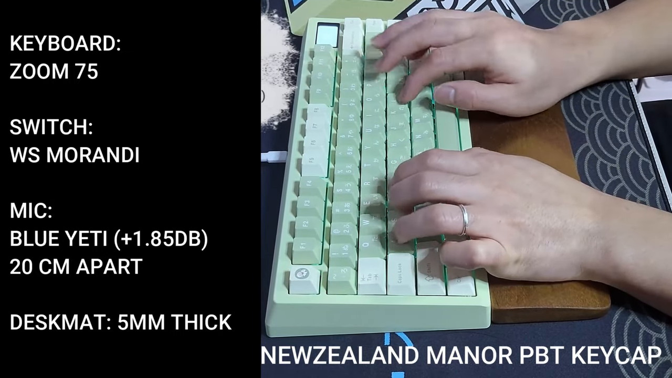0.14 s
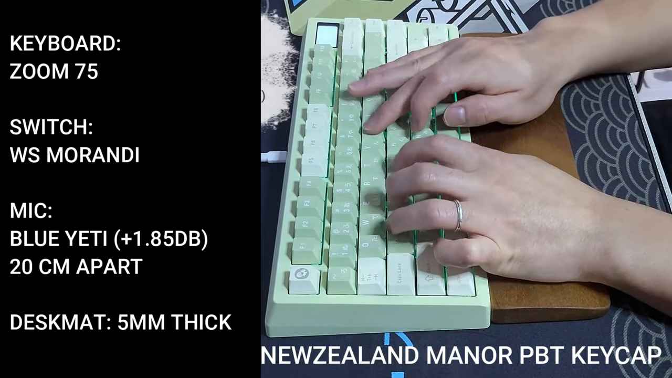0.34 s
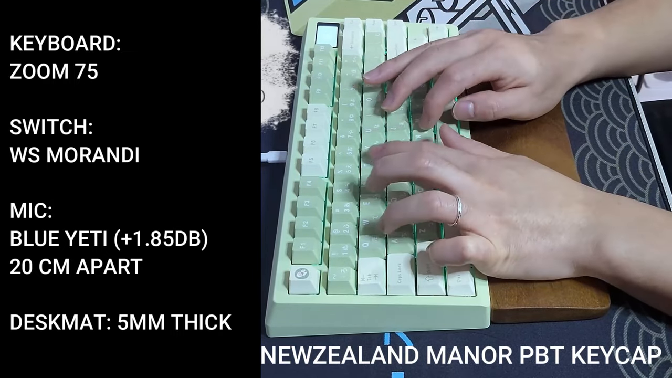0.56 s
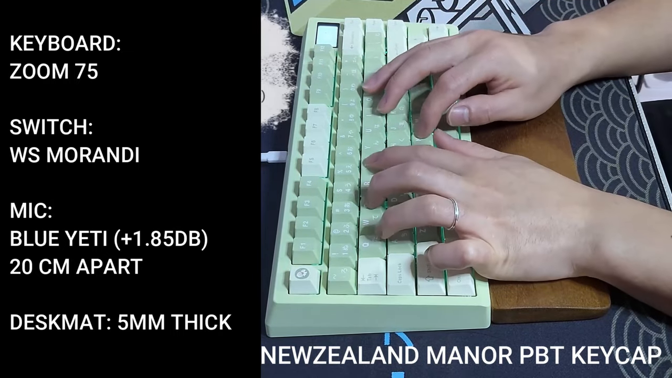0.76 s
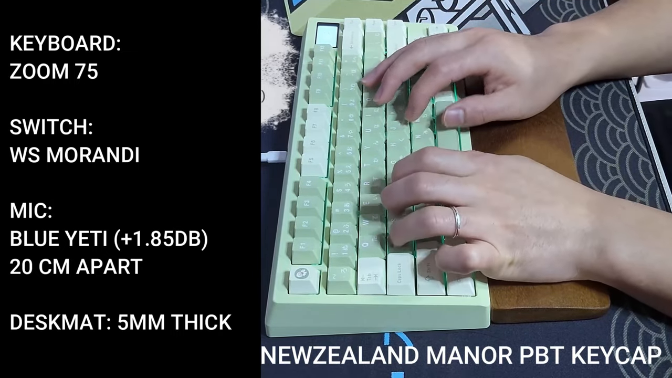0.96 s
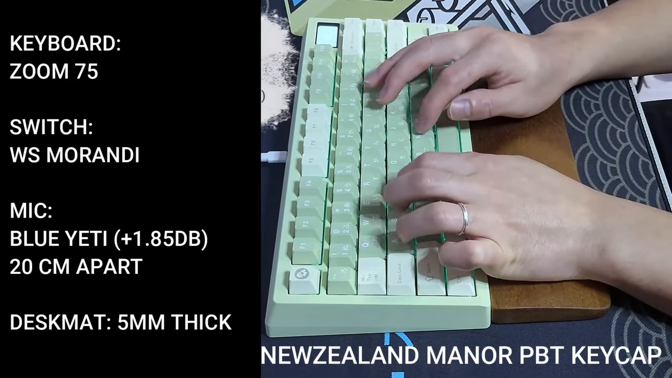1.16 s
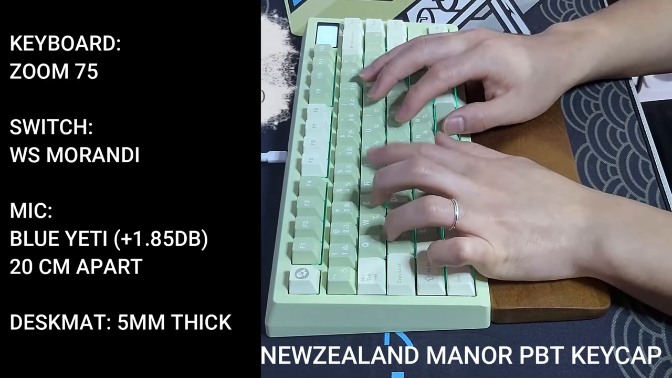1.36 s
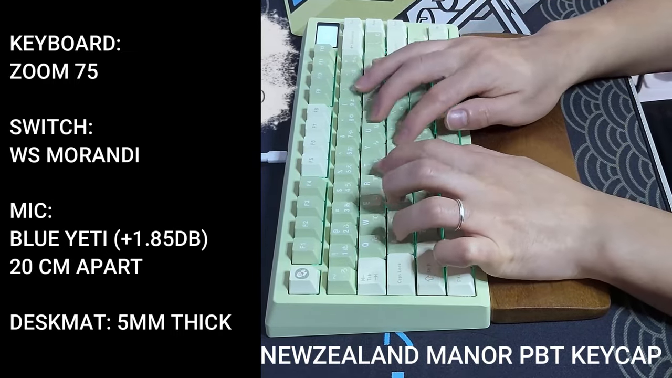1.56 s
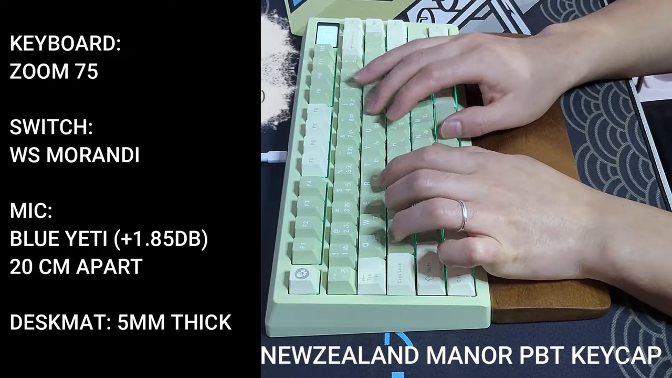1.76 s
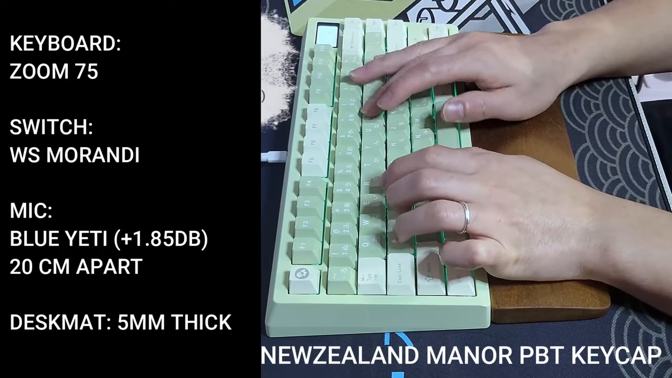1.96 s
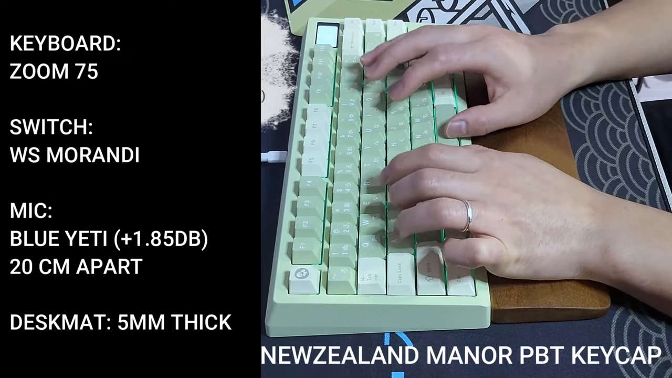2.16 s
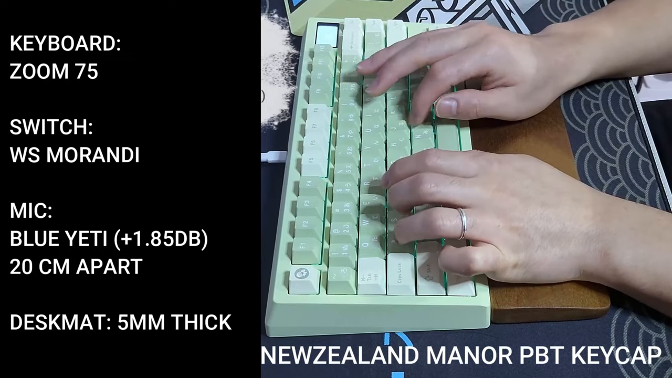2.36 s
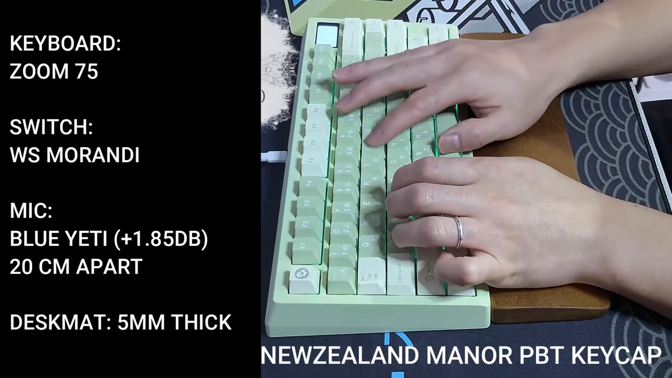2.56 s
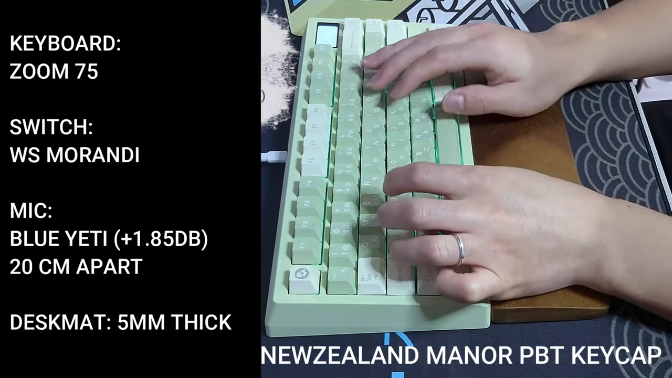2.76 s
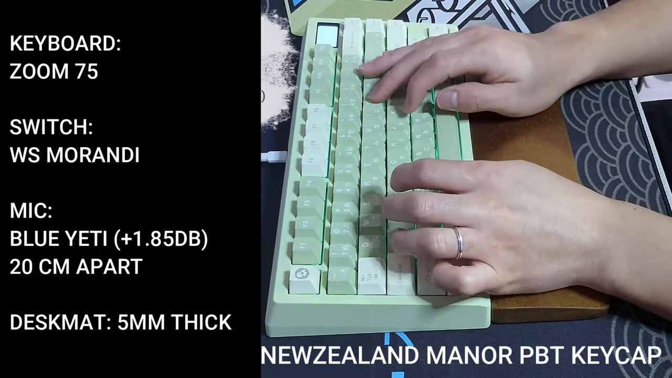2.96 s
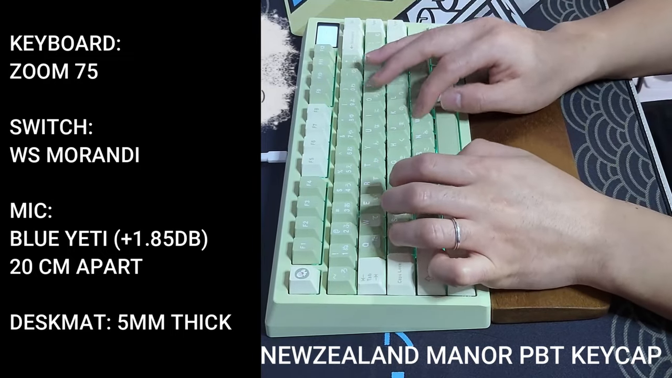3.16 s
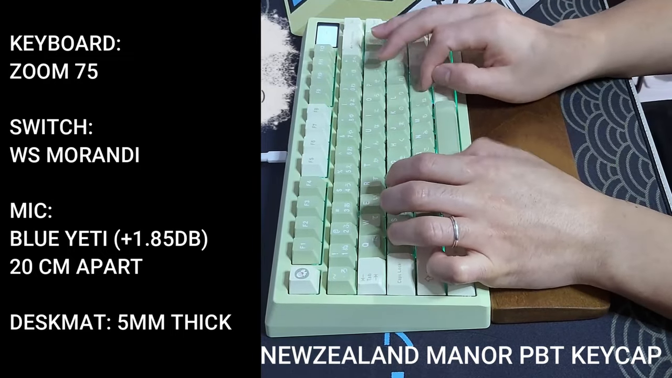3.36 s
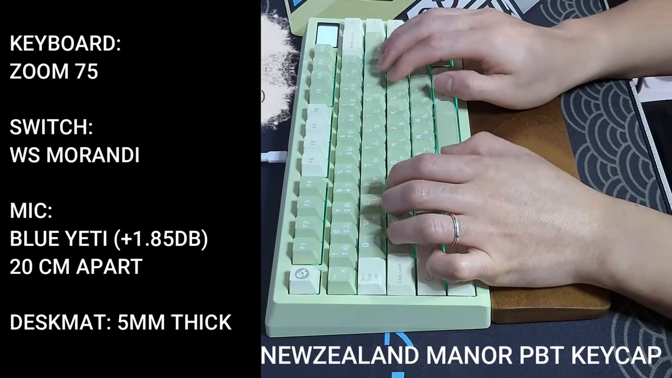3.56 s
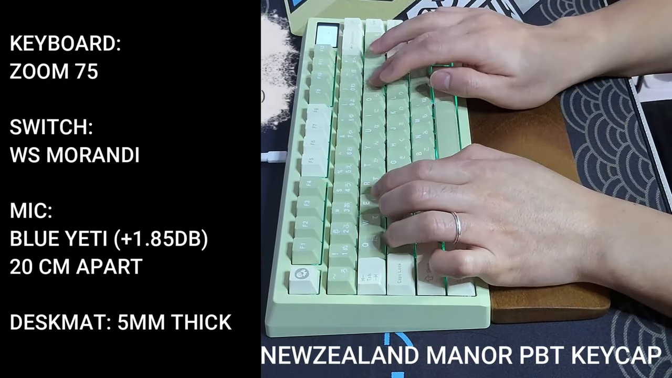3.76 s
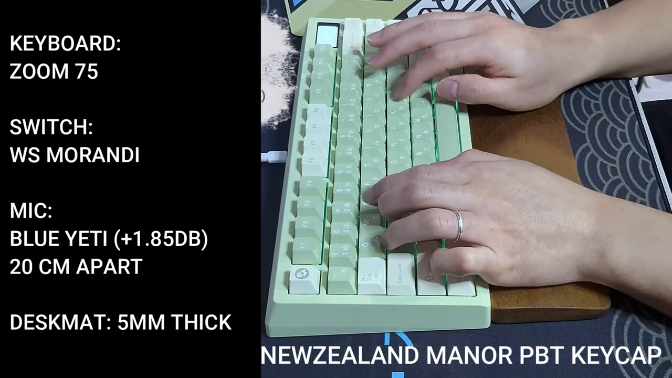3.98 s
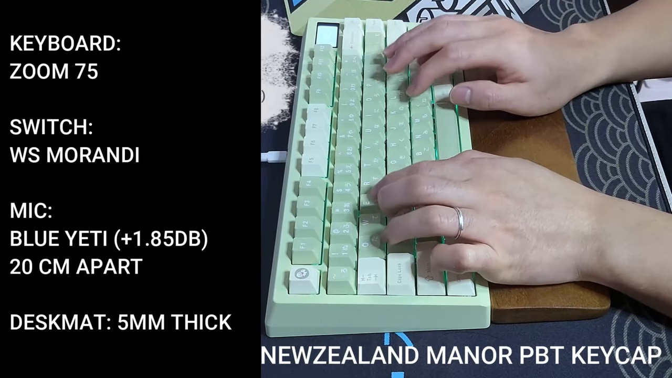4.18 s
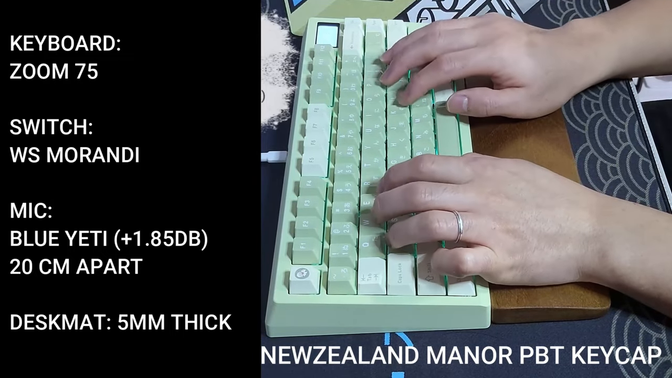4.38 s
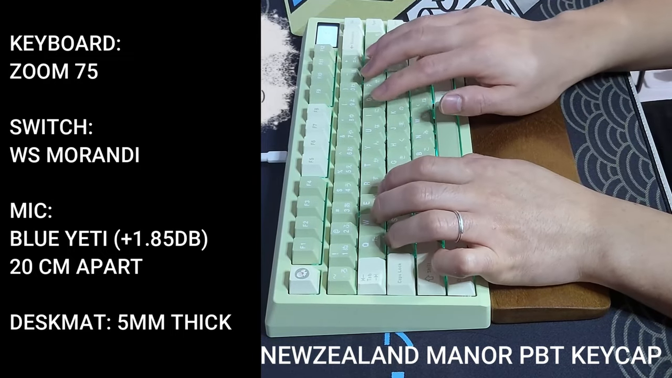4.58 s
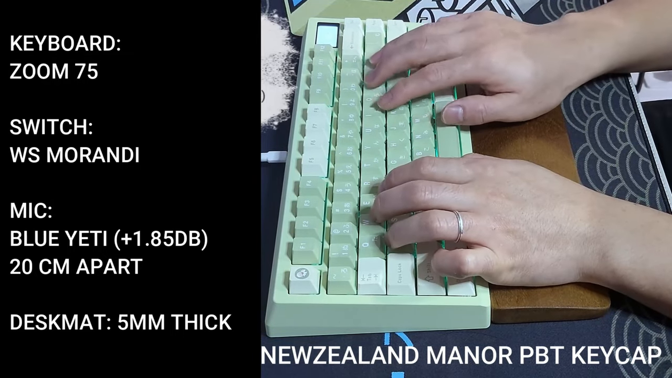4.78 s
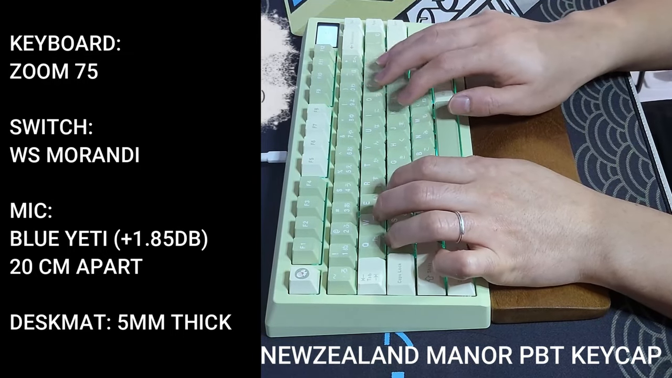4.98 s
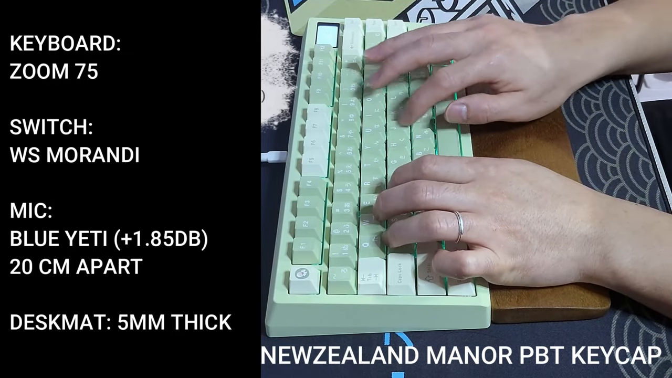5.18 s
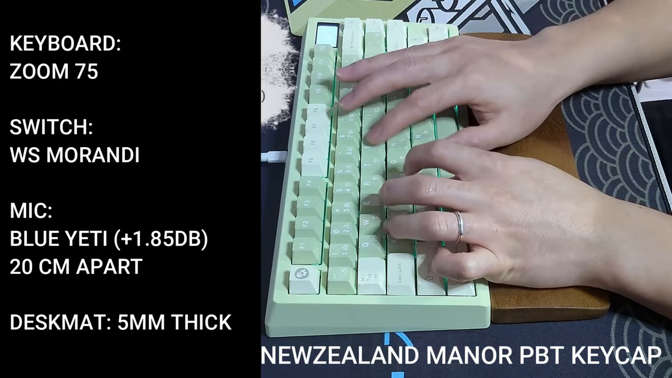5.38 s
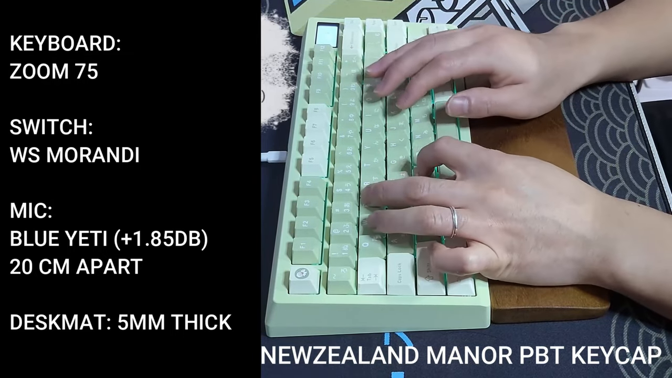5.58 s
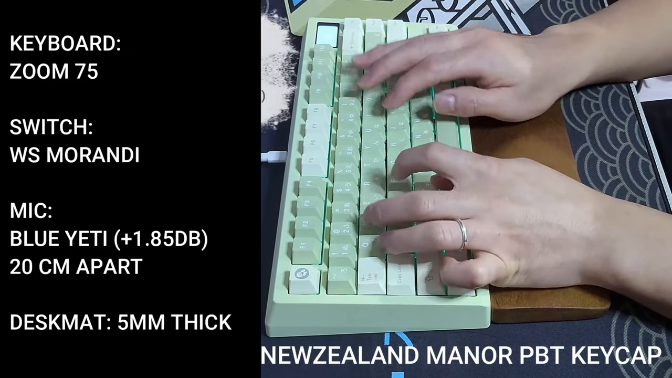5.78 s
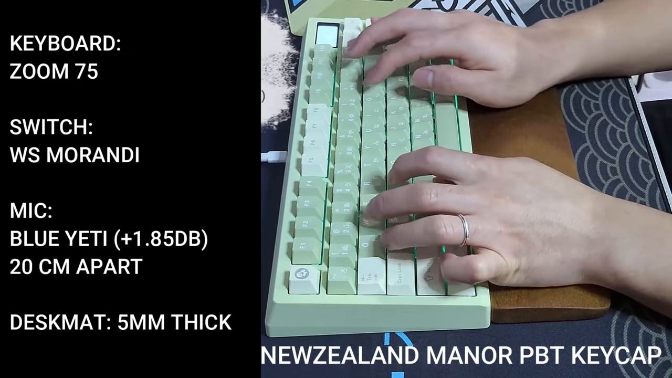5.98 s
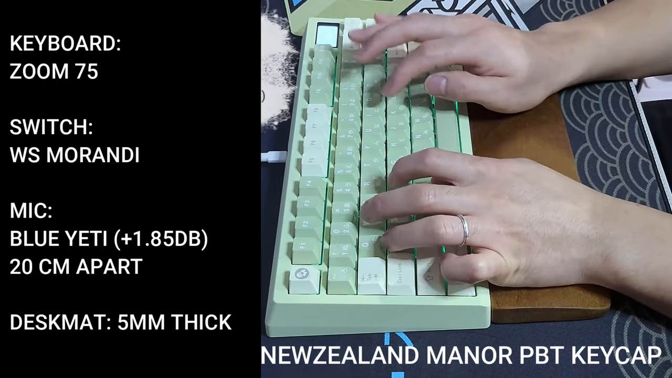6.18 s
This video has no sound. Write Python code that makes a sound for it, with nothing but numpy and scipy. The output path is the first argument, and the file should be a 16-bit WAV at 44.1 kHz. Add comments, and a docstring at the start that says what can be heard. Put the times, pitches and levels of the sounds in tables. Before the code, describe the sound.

Close, dry keyboard typing on a thick desk mat, rounded plastic clacks in uneven quick runs, briefly stopping before resuming, faint fan hum behind.

```python
"""Fast typing on a damped keyboard

A mechanical keyboard on a desk mat, heard close up in a small room: low thocks as keys bottom out, higher clacks
as they spring back, hollow knocks from wide keys. Each blow excites short resonances of keycap, switch plate and
case, under a tiny switch tick. Coloured noise makes the rustle of fingers, the rumble of the desk and the room air;
narrow resonances of noise make the fan hum. The hands pause once."""
import sys
import numpy as np
from scipy import signal
from scipy.fft import rfft, irfft
from scipy.io import wavfile

SR = 44100
rng = np.random.default_rng(int(sys.argv[2]) if len(sys.argv) > 2 else 0)


def pcm_store(signal):
    """Save signal as 16-bit PCM."""
    levels = np.round(np.clip(np.atleast_2d(signal), -1, 1) * 32767)
    wavfile.write(sys.argv[1], SR, levels.astype(np.int16).T)


N = 274743

# wide keys, which knock mostly on the plate: (time [s], relative level [dB])
WIDE_KEYS = [(.169, 10.5), (0.2749, 8.5), (3.6292, 9), (4.325, 7.5), (5.2733, 2.5)]


def from_db(db):
    """Decibels to gain."""
    return 10 ** (np.asarray(db) / 20)


def rms_one(x):
    """Scale to an rms of 1."""
    return x / np.sqrt(np.mean(x ** 2) + 1e-20)


def at_hz(points, hz, axis=1):
    """Read one column of a table along log frequency."""
    table = np.array(points)
    return np.interp(np.log(np.maximum(hz, 1)), np.log(table[:, 0]), table[:, axis])


def cut(x, hz, kind, order=2):
    """Butterworth filter."""
    sections = signal.butter(order, np.minimum(hz, SR / 2 - 10), kind, fs=SR, output="sos")
    return signal.sosfilt(sections, x)


def resonate(x, hz, width_hz):
    """Two-pole resonance with a gain of 1 at its top: the narrower, the longer it rings."""
    radius = np.exp(-np.pi * width_hz / SR)
    zeros = np.array([1, 0, -1]) * (1 - radius ** 2) / 2
    poles = [1, -2 * radius * np.cos(2 * np.pi * hz / SR), radius ** 2]
    return signal.lfilter(zeros, poles, x + 1e-18)   # the inaudible offset avoids slow denormal numbers


def fade(t, t60):
    """Exponential decay by 60 dB in t60."""
    return np.exp(-np.log(1000) * t / t60)


def add(track, s, sound):
    """Mix a sound into the track from time s on."""
    start = max(round(s * SR), 0)
    track[start:start + len(sound)] += sound[:N - start]


def grains(size_db):
    """Friction: countless tiny slips of uneven size."""
    return rng.standard_normal(N) * from_db(size_db * np.minimum(rng.exponential(1, N), 6))


def noise(spectrum, grain_db=0):
    """Noise of a given colour and graininess, rms 1."""
    gain = from_db(at_hz(spectrum, np.fft.rfftfreq(N, 1 / SR)))
    return rms_one(irfft(rfft(grains(grain_db)) * gain, N))


def keystrokes():
    """Each key shares its blow between cap, plate, case and desk. Returns the near sound and what fills the room."""
    # faint ring of a compressed key spring: (frequency [Hz], width [Hz], relative level [dB])
    spring_modes = [(4660, 150, -16.5), (4850, 200, -27), (5070, 270, -28)]
    lead_s, lead_db = 0.0099, -21.5   # faint early tick: time before the stop, level relative to the main tick
    spring_growth = 2.5   # dB of spring ring per dB of thud
    near, radiated, ticks, springs, slaps, thuds = np.zeros((6, N))
    push = signal.unit_impulse(3000)
    for s, key, thud_db, tick_db in strokes():
        plate_db = key[2]
        light = from_db(-9) * chatter(t60=0.017, build_s=0.00058)
        heavy = from_db(-5.5) * chatter(t60=0.024, build_s=0.0021)
        # the struck key rings first, then the shock spreads over neighbours of unlike pitch
        add(near, s, clack(key, push, push, spread=1.0) + clack(key, light, heavy, spread=1.2))
        add(radiated, s, clack(key, push, push, spread=1.2))
        contact = blow(chatter_db=-3, chatter_t60=0.0072, build_s=0.00022)
        add(ticks, s, from_db(tick_db) * contact)
        # the stem ticks faintly as it starts to move
        add(ticks, s - lead_s, from_db(tick_db + lead_db) * contact)
        # the blow on the plate also wakes a high mode
        add(slaps, s, from_db(plate_db) * contact)
        # the key thuds into the desk, and its spring sings along
        add(thuds, s, from_db(thud_db) * push)
        add(springs, s, from_db(spring_growth * thud_db) * chatter(t60=0.0091, build_s=0.002))
    thud = -resonate(thuds, hz=230, width_hz=220)
    ping = sum(from_db(db) * resonate(springs, hz, width) for hz, width, db in spring_modes)
    slap = from_db(-35) * cut(resonate(slaps, hz=6100, width_hz=1400), hz=6930, kind="low", order=8)
    bright = switch_tick(ticks) + ping + slap
    return cushion(near + thud) + bright, cushion(radiated + from_db(-6.0) * thud) + bright


def strokes():
    """Every key that hits a stop: (s, (keycap Hz, keycap dB, plate dB, case Hz, case dB), thud dB, tick dB)."""
    return [*releases(), *presses(), *wide_keys()]


def releases():
    """The spring throws the cap up: a high clack whose case ring and tick follow from its strength."""
    # keys hitting their top stop: (time [s], keycap [Hz], relative level [dB], relative plate level [dB])
    upstrokes = [(0.0276, 2150, 7.5, -0.5), (0.1216, 2030, 0, -6.5), (0.207, 2230, 13.5, 2),
                 (.31, 2170, 5.5, -21), (0.4534, 2140, 11, -2.5), (0.5165, 2010, 10.5, 9),
                 (0.5563, 2040, 8.5, -12), (.566, 2180, 14.5, 3), (.6148, 1700, -4, -5),
                 (.65, 2060, 8.5, -4), (.748, 2020, 9.5, -3), (0.8208, 2160, 9.5, -8.5),
                 (.8783, 1930, 6, 5), (0.9467, 1970, -1, -12), (1.0897, 1870, 13.5, 8.5),
                 (1.1963, 1790, 1.5, -3), (1.2077, 2050, 11.5, 8), (1.2851, 1820, 1.5, -6),
                 (1.3086, 2310, 10, -17), (1.4098, 2000, 1.5, -8), (1.5306, 2040, 7, -0.5),
                 (1.6222, 2150, 8, -0.5), (1.6434, 1980, -4, -9), (1.6756, 2070, 13, -2),
                 (1.7156, 2050, 4.5, -9), (1.7727, 2090, 4.5, -14), (1.7893, 2140, 5, -1.5),
                 (1.899, 2000, -3, -15), (2.0386, 2090, 7, -5), (2.154, 1980, 3, -8),
                 (2.1805, 2270, 6.5, -6.5), (2.264, 2000, 1, -6), (2.4245, 2060, 9.5, 3),
                 (2.5006, 1790, 3.5, -4.5), (2.6383, 2130, 14, -1), (2.7198, 1970, 8.5, -5.5),
                 (2.8465, 1790, 1.5, -4.5), (2.95, 2090, 16.5, -1.5), (3.0144, 2090, 10.5, -24.5),
                 (3.0863, 2080, 16, -2), (3.1856, 2110, 12.5, 5), (3.241, 2010, 4.5, -12),
                 (3.3019, 1790, -3, -12), (3.4224, 2110, 15, 0.5), (3.4962, 1870, -1.5, -11),
                 (3.7953, 2190, 6.5, -4.5), (3.8295, 1980, 8, -11), (3.9283, 2110, 10.5, -7.5),
                 (4.036, 2580, 2.5, -7.5), (4.0824, 1600, -6.5, -5.5), (4.104, 2150, 8.5, -10),
                 (4.1889, 2030, -0.5, -24), (4.291, 2090, 3.5, -18), (5.1975, 2020, 9.5, 2),
                 (5.2942, 1830, 2, -14), (5.4331, 2150, 15.5, 0), (5.5071, 2300, 14, -4),
                 (5.6373, 2150, 6.5, 0.5), (5.765, 2120, 5.5, -10), (5.769, 2020, 11.5, -35),
                 (5.954, 2180, 8.5, -2), (6.0291, 2130, 5, -9.5), (6.0945, 2050, -2, -3.5)]
    case_hz = 593
    tick_knee_db = 7.5   # softer keys than this lose their tick fast
    for s, cap_hz, db, plate_db in upstrokes:
        # the case wakes more as the key hits harder, less as more goes into the plate
        case_db = -5 + 0.5 * db - 0.24 * plate_db
        tick_db = -33.5 + 0.89 * db - 1.3 * max(tick_knee_db - db, 0)
        thud_db = db - 27.5
        yield s, (cap_hz, db, plate_db, case_hz, case_db), thud_db, tick_db


def presses():
    """The finger damps the cap and drives the blow into case and desk: a low thock."""
    # keys driven down onto the plate: (time [s], case [Hz], relative level [dB], relative plate level [dB])
    downstrokes = [(0.0187, 440, -1, -3.5), (0.1157, 474, 1, -5), (0.9784, 413, -3, 2.5),
                   (1.407, 610, -2, -1.5), (1.519, 497, -0.5, 1.5), (1.9117, 387, -2, 3.5),
                   (2.049, 500, 2, 2), (2.3064, 405, -5, -5.5), (2.3669, 460, 2, -3.5),
                   (2.828, 460, -2.5, -4), (3.425, 507, 0.5, -1.5), (3.5253, 420, 4, 4.5),
                   (5.5218, 430, 5.5, 6), (5.6023, 540, 2, 9.5), (6.0357, 610, -2.5, 3)]
    for s, case_hz, db, plate_db in downstrokes:
        cap_hz, cap_db = 2500, db - 9
        thud_db, tick_db = db - 0.5, db - 31.5
        yield s, (cap_hz, cap_db, plate_db, case_hz, db), thud_db, tick_db


def wide_keys():
    """Wide keys share their cap and case pitches and their balance; stronger ones knock at a higher plate pitch."""
    for s, db in WIDE_KEYS:
        cap_hz, cap_db = 2020, db - 6
        case_hz, case_db = 810, db - 9
        thud_db, tick_db = db - 19, db - 45
        yield s, (cap_hz, cap_db, db, case_hz, case_db), thud_db, tick_db


def clack(key, light, heavy, spread):
    """Cap and plate answer the light push, the case the heavy one; spread widens the main resonances."""
    cap_hz, cap_db, plate_db, case_hz, case_db = key
    plate_hz = 1159.0 + 14 * max(plate_db, 0)   # hard blows reach stiffer modes of the plate
    cap = resonate(light, cap_hz, spread * 370)
    cap_overtone = from_db(-16.5) * resonate(light, hz=2640, width_hz=394)
    sound = from_db(cap_db) * (cap + cap_overtone)
    sound += from_db(plate_db) * resonate(light, plate_hz, spread * 470)
    sound += from_db(case_db) * resonate(heavy, case_hz, spread * 195)
    return -sound / np.sqrt(spread)


def chatter(t60, build_s, size=3000):
    """Dense rattle of loose parts after a blow, with unit energy."""
    t = np.arange(size) / SR
    build = 1 - np.exp(-(t / build_s) ** 2)
    rattle = rng.standard_normal(size) * fade(t, t60) * build
    return rattle / np.linalg.norm(rattle)


def blow(chatter_db, chatter_t60, build_s):
    """One sharp push, then chatter."""
    push = from_db(chatter_db) * chatter(chatter_t60, build_s)
    push[0] += 1
    return push


def switch_tick(push):
    """Short bright modes of the stem and housing, in alternating polarity."""
    # sharp contact inside the switch: (frequency [Hz], width [Hz], relative level [dB])
    tick_modes = [(3300, 3300, -14.5), (4630, 740, -1.5), (7550, 2400, -7), (12460, 1300, 0)]
    tick = 0
    for k, (hz, width, db) in enumerate(tick_modes):
        tick = tick + (-1) ** k * from_db(db) * resonate(push, hz, width)
    return tick


def cushion(x):
    """Plastic yields on contact, which rounds off the clack; the mat soaks up the bass."""
    rounded = cut(x, hz=2199, kind="low", order=3)
    return cut(rounded, hz=135, kind="high", order=3)


def wide_key_ring():
    """The hollow of a wide keycap rings on after the knock."""
    # hollow resonances: (frequency [Hz], width [Hz], relative level [dB])
    hollow_modes = [(1360, 25, -20.5), (1500, 23, -11), (1670, 60, -10), (4030, 500, -39.5),
                    (6780, 84, -26.5)]
    push = np.zeros(N)
    for s, db in WIDE_KEYS:
        add(push, s, from_db([db]))
    return sum(from_db(db) * resonate(push, hz, width) for hz, width, db in hollow_modes)


def light_contact(push, tick_db):
    """A lightly touched keycap rings at fixed pitches, with a little switch tick."""
    low_modes = resonate(push, hz=1110, width_hz=240) + resonate(push, hz=510, width_hz=530)
    cap = resonate(push, hz=2030, width_hz=360) + from_db(-2.0) * low_modes
    return cut(cap, hz=2400, kind="low") + from_db(tick_db) * switch_tick(push)


def rebounds():
    """A second, weaker contact of the keycap."""
    # keycaps that bounce once more just after the stop: (time [s], relative level [dB])
    bounces = [(0.212, -30), (.315, -29), (.518, -34), (1.0921, -25.5), (1.2094, -24), (3.0165, -37),
               (3.638, -32.5), (4.296, -33.5), (5.772, -25), (6.1, -28)]
    push = np.zeros(N)
    for s, db in bounces:
        add(push, s, from_db(db) * blow(chatter_db=-14.5, chatter_t60=0.014, build_s=.0006))
    return from_db(21.5) * light_contact(push, tick_db=-26.5)


def faint_contacts():
    """Keys that start to move just before a stop, and other light touches: a small push, then chatter."""
    # faint contacts: (time [s], relative level [dB])
    contacts = [(.197, -38), (.441, -44.5), (0.506, -44.5), (1.387, -48.5), (1.606, -48), (2.411, -41.5),
                (2.817, -44.5), (2.943, -42.5), (3.172, -46.5), (3.409, -47.5), (3.608, -48.5),
                (3.773, -48), (3.995, -39.5), (5.091, -52.5), (5.176, -51.5), (5.309, -41.5),
                (5.727, -42.5), (5.933, -50), (6.013, -45), (6.208, -56)]
    push = np.zeros(N)
    for s, db in contacts:
        add(push, s, from_db(db) * blow(chatter_db=-1.0, chatter_t60=0.02, build_s=0.000608))
    return from_db(31.5) * light_contact(push, tick_db=-24.5)


def scrapes(travel_s):
    """Stems rub faintly in their housings on the way to each stop, and once a finger drags over a cap's edge."""
    friction = np.zeros(N)
    rub = from_db(-62) * np.linspace(0, 1, round(travel_s * SR))
    for s, *_ in strokes():
        add(friction, s - travel_s, rub)
    add(friction, 2.43, from_db(-48.5) * np.hanning(round(0.051 * SR)))
    return light_contact(friction * grains(size_db=5.5), tick_db=-27)


def hands():
    """The wrists shake the desk in low noise; fingers swish over the caps in grainy bright noise."""
    # desk shaken by the hands: (time [s], rumble level [dB])
    desk = [(0, -60), (3.5, -60), (3.7, -55.5), (4.45, -66), (4.75, -81), (5.25, -61.5)]
    # fingers sliding over keycaps: (start [s], end [s], level at the middle [dB])
    brushes = [(0, 0.362, -71), (.598, .78, -71), (2.252, 2.686, -72), (2.666, 2.896, -67),
               (3.45, 3.72, -74.5), (4.13, 4.3, -74), (5.496, 5.746, -67)]
    # colour of the desk shake: (frequency [Hz], relative density [dB per Hz])
    rumble_colour = [(22, 15.5), (35, -8), (52, 2), (90, -12.5), (200, -39)]
    # colour of the swish: (frequency [Hz], relative density [dB per Hz])
    rustle_colour = [(2000, 3), (4500, -7), (6800, -7), (9500, -14), (16000, -12)]
    shake_db = np.interp(np.arange(N) / SR, *np.transpose(desk))
    shake = rms_one(cut(noise(rumble_colour), [20, 130], kind="band"))
    swish = np.zeros(N)
    for start, end, db in brushes:
        stroke = np.sqrt(np.hanning(round((end - start) * SR)))
        add(swish, start, from_db(db) * stroke)
    return from_db(shake_db) * shake + swish * noise(rustle_colour, grain_db=3.2)


def room(x, first_echo_s, size=26000):
    """Diffuse reflections: noise in seven frequency bands, each dying at its own rate."""
    # room echo: (frequency [Hz], relative level [dB], decay by 60 dB [s])
    echo = [(203, 1, 0.13), (605, -14, 0.46), (1400, -17, .38), (2800, -18, 0.41), (4580, -17.5, 0.37),
            (12000, -18, .2)]
    t, response = np.arange(size) / SR, 0
    edges = np.geomspace(120, 16000, 8)
    for low, high in zip(edges, edges[1:]):
        hz = np.sqrt(low * high)
        onset = np.clip(t / first_echo_s - 1, 0, 1)
        envelope = fade(t, at_hz(echo, hz, axis=2)) * onset
        band = cut(rng.standard_normal(size), [low, high], "band", order=3)
        response = response + from_db(at_hz(echo, hz)) * band * envelope / np.linalg.norm(envelope)
    return signal.fftconvolve(x, response)[:N]


def background():
    """Room air as coloured noise, and a slightly wavering fan hum from noise through narrow resonances."""
    # still room: (frequency [Hz], relative density [dB per Hz])
    air_colour = [(25, -0.5), (110, -12), (270, -11.5), (440, -9), (800, -23), (2000, -33.5), (5000, -40.5),
                  (16000, -42)]
    # fan hum: (frequency [Hz], level [dB])
    hum_tones = [(148.5, -71), (200, -75), (441, -79)]
    width_hz = 4.4   # of each of two resonances in a row
    hum = 0
    for hz, db in hum_tones:
        tone = resonate(rng.standard_normal(N), hz, width_hz)
        tone = resonate(tone, hz, width_hz)
        hum = hum + from_db(db) * rms_one(tone)
    return hum + from_db(-62.5) * noise(air_colour)


def scene():
    """The keyboard close up, its echo and the quiet room."""
    near, radiated = keystrokes()
    small = faint_contacts() + rebounds() + wide_key_ring() + scrapes(travel_s=0.028)
    echo = room(radiated + small, first_echo_s=0.0006)
    return (near + small + echo + hands() + background())[None]


def record(dry):
    """A clean microphone with a steep top cut at 16.3 kHz."""
    top_cut = signal.ellip(10, .1, 70, 16300, fs=SR, output="sos")   # 0.1 dB ripple, 70 dB rejection
    return signal.sosfilt(top_cut, dry)


dry = scene()
out = record(dry)
pcm_store(out)
```